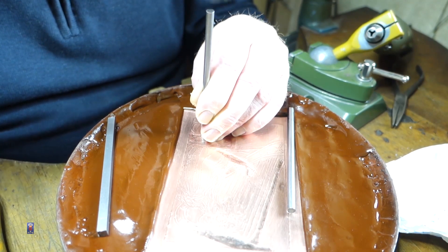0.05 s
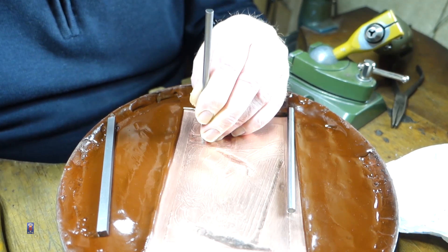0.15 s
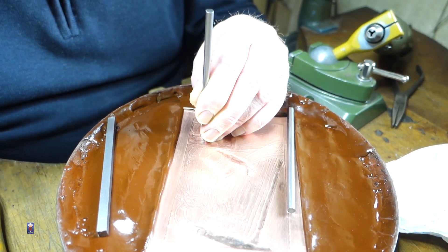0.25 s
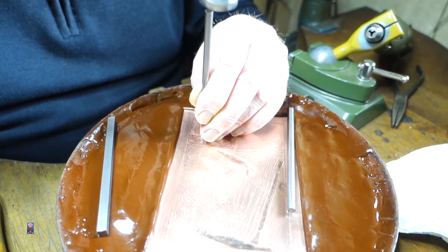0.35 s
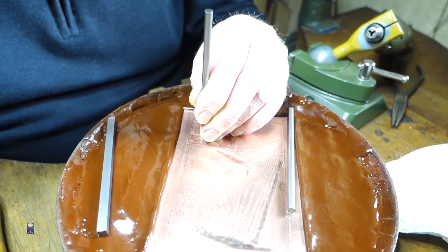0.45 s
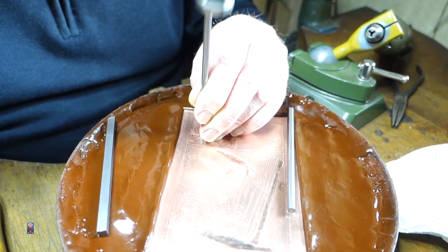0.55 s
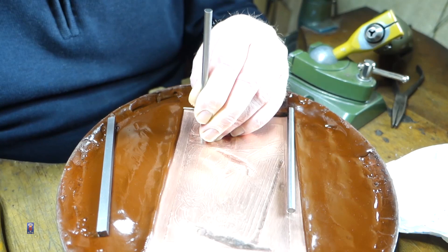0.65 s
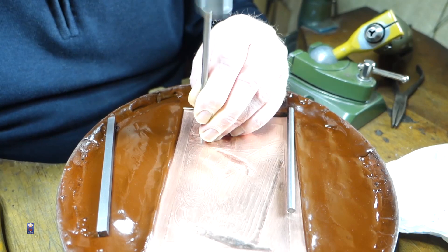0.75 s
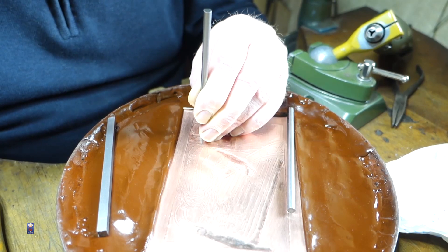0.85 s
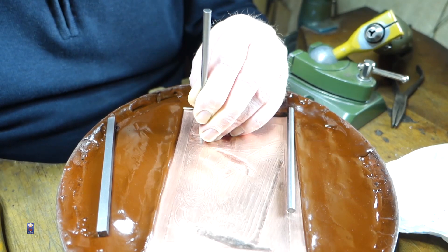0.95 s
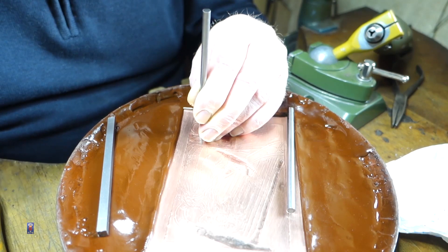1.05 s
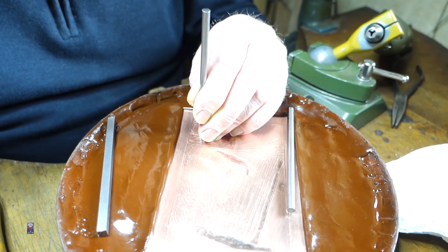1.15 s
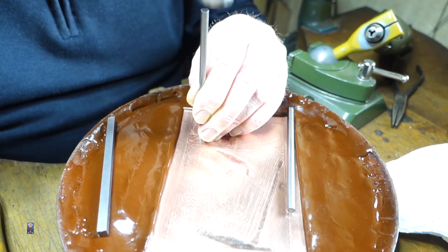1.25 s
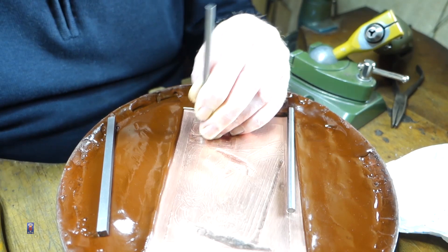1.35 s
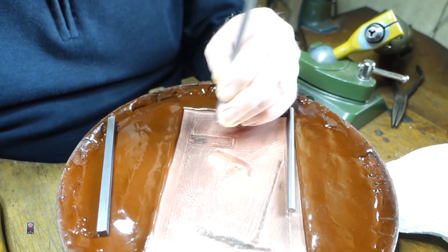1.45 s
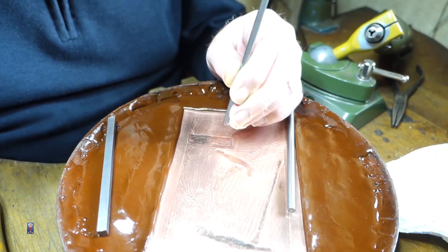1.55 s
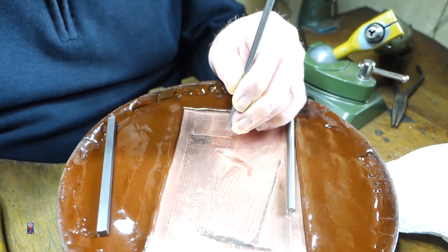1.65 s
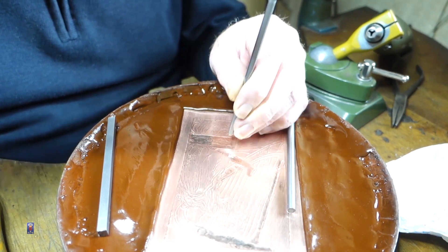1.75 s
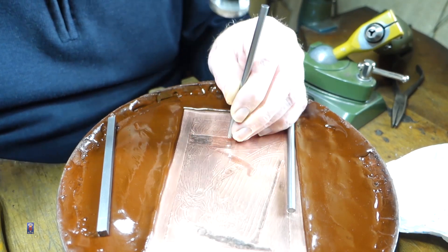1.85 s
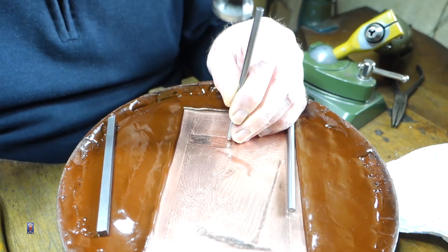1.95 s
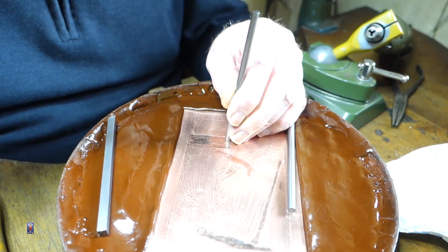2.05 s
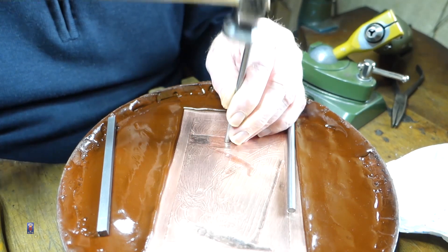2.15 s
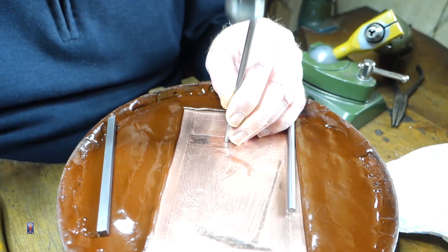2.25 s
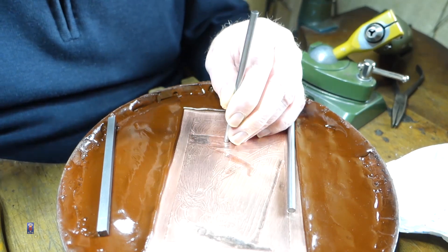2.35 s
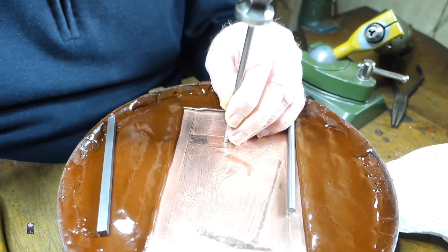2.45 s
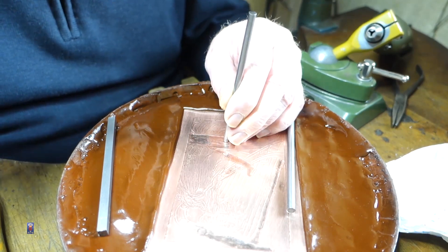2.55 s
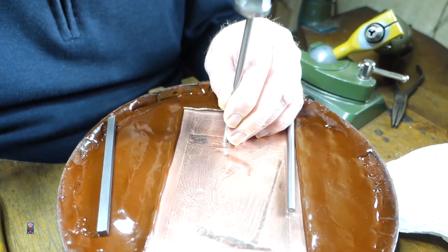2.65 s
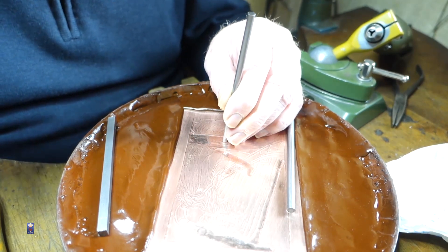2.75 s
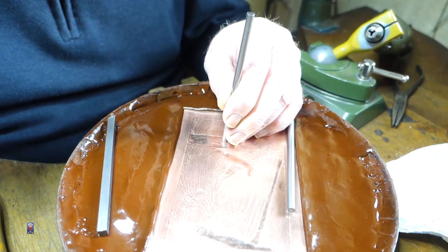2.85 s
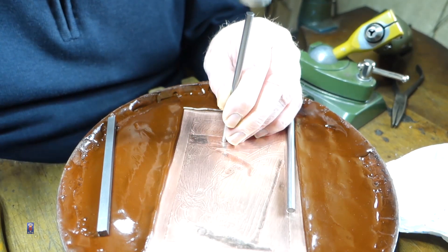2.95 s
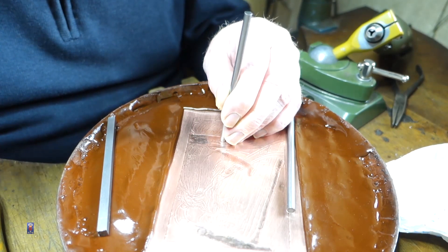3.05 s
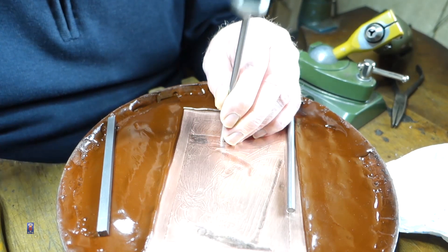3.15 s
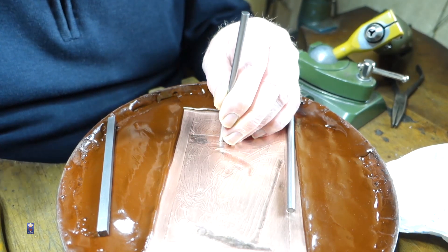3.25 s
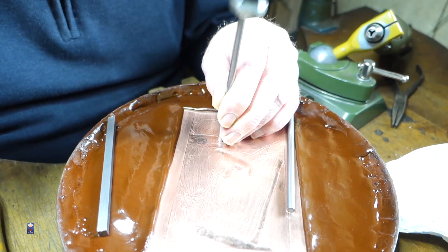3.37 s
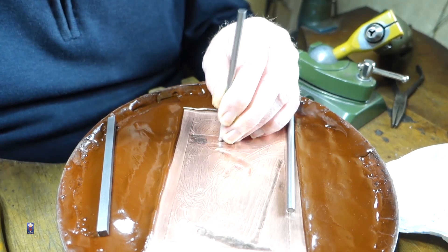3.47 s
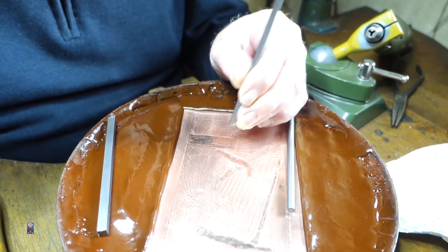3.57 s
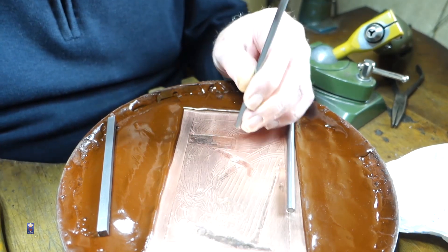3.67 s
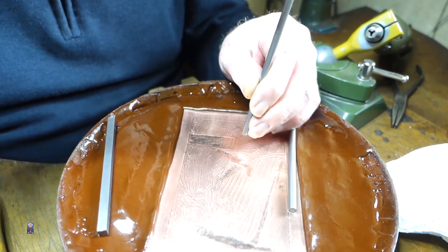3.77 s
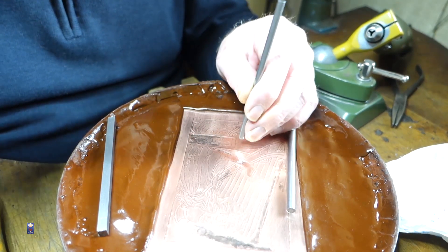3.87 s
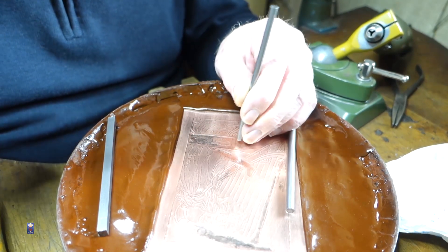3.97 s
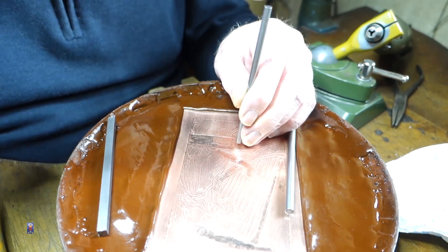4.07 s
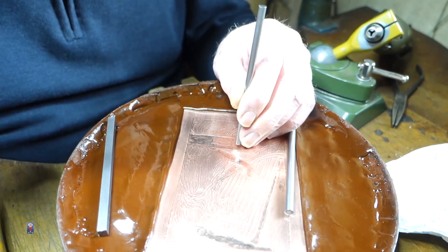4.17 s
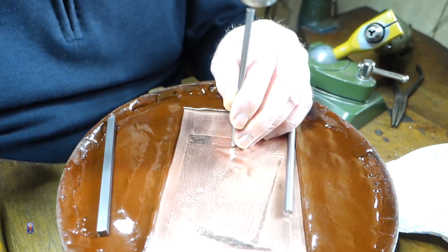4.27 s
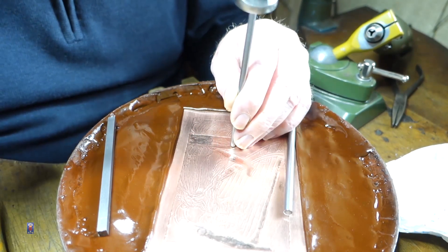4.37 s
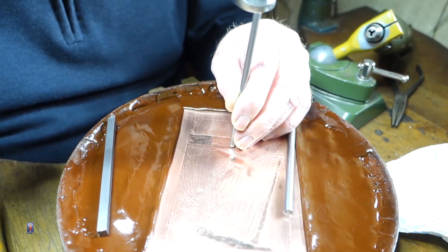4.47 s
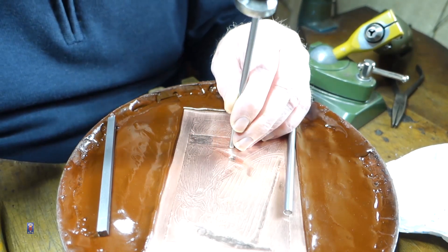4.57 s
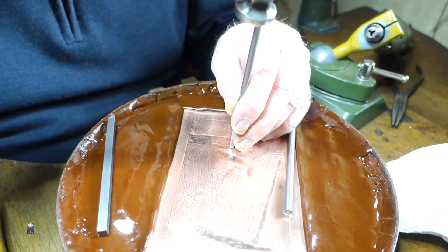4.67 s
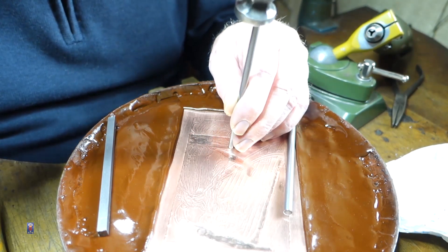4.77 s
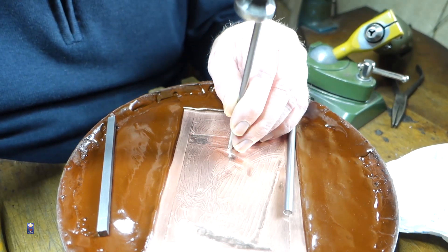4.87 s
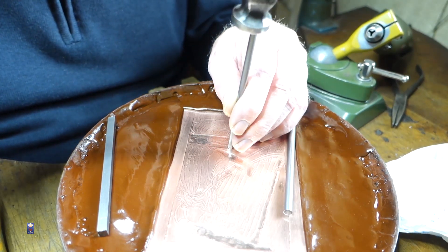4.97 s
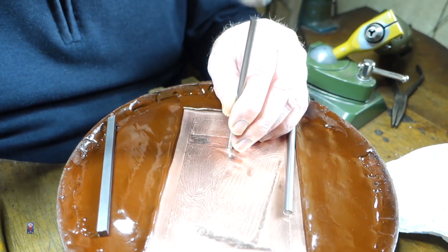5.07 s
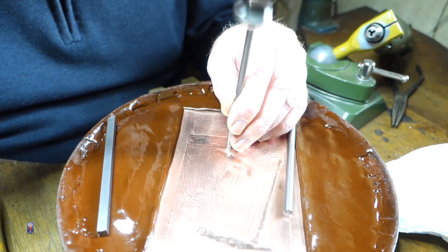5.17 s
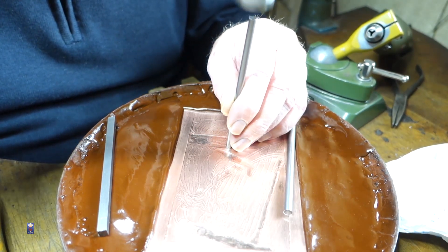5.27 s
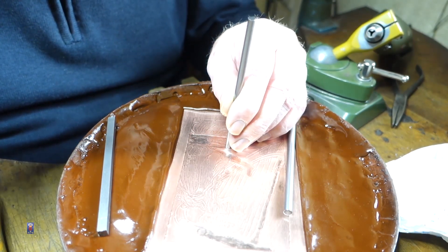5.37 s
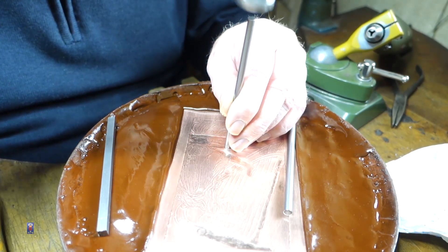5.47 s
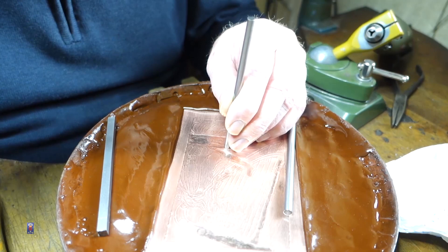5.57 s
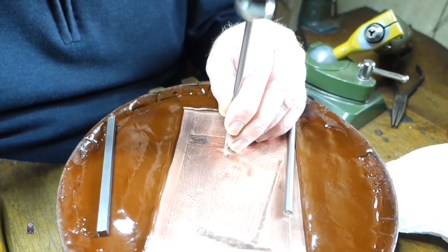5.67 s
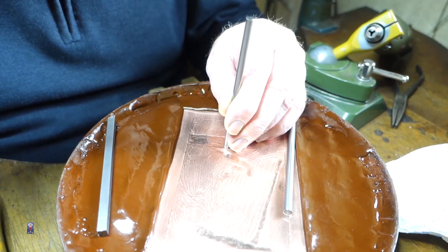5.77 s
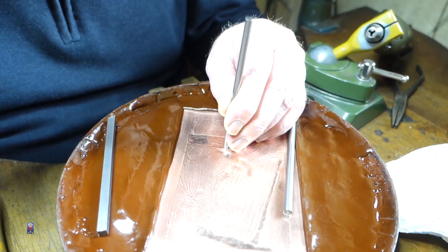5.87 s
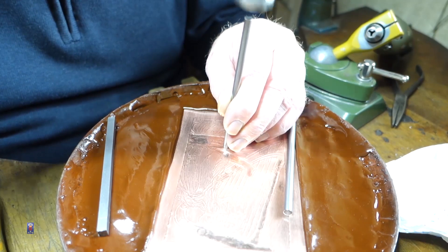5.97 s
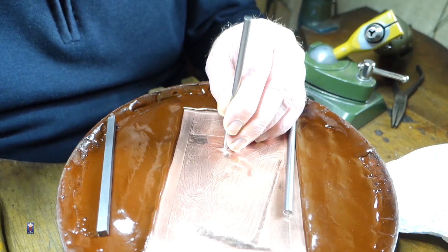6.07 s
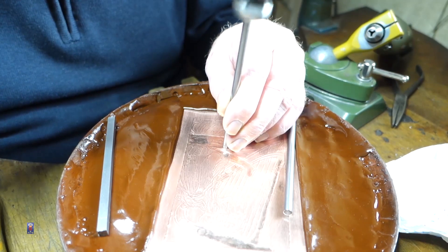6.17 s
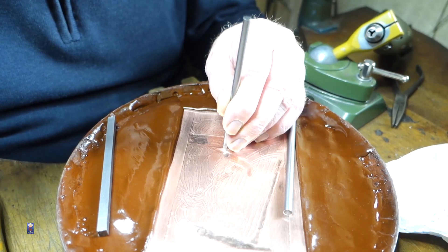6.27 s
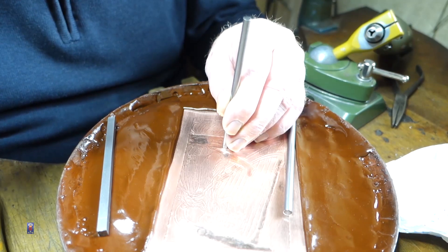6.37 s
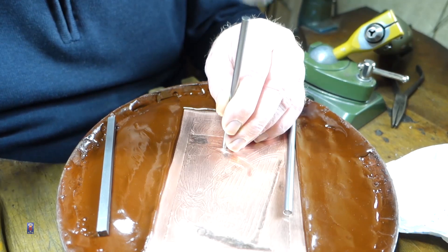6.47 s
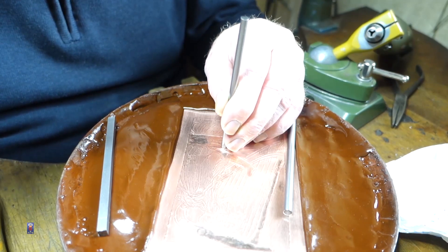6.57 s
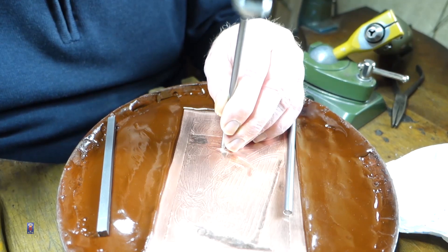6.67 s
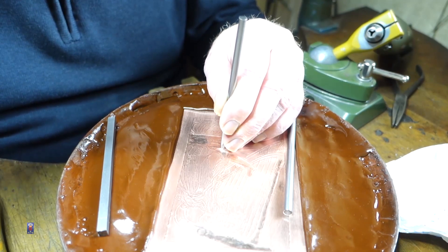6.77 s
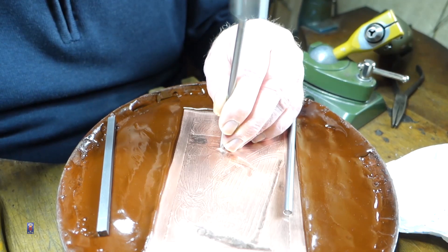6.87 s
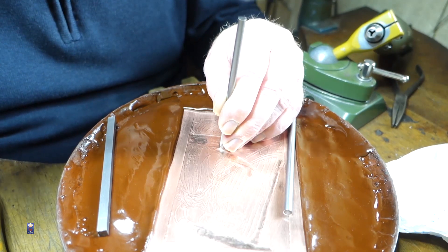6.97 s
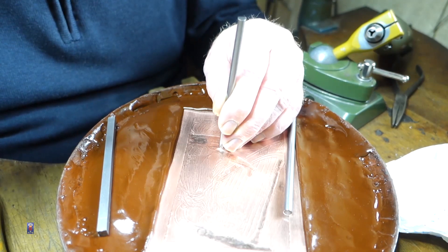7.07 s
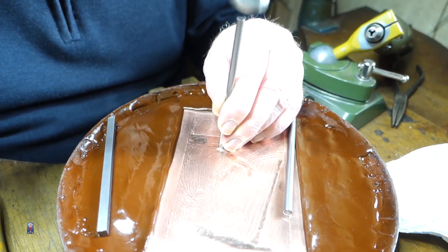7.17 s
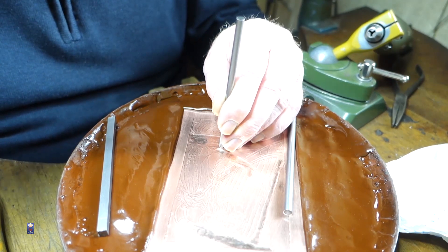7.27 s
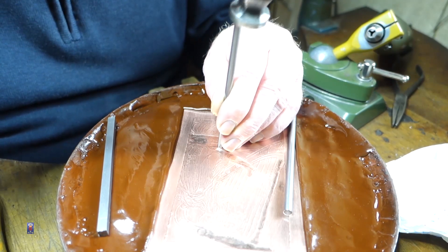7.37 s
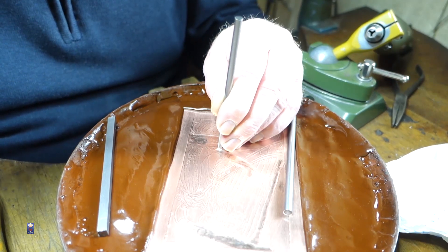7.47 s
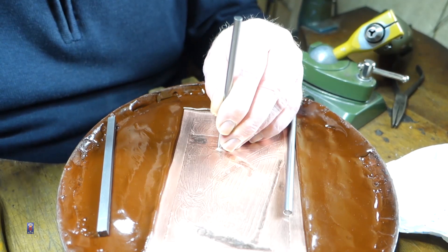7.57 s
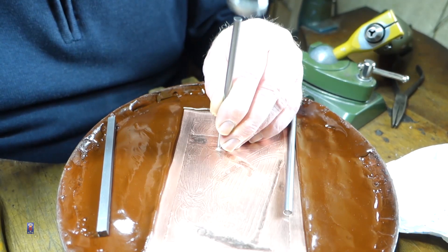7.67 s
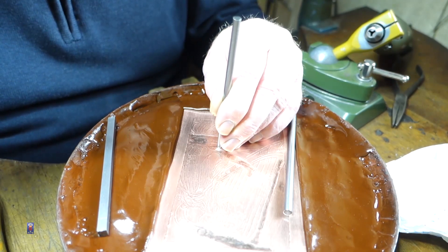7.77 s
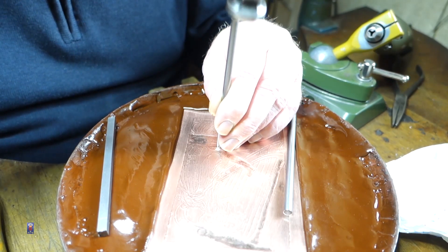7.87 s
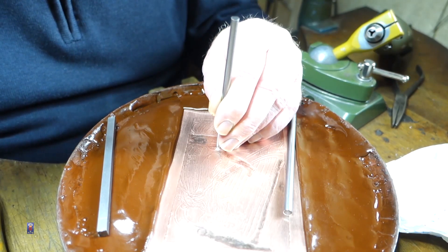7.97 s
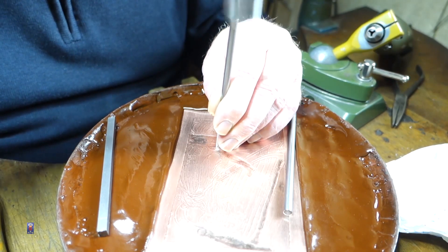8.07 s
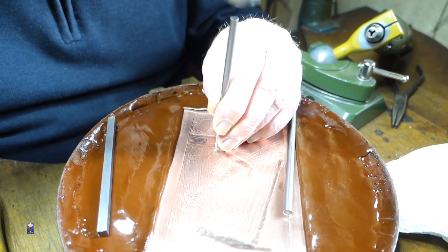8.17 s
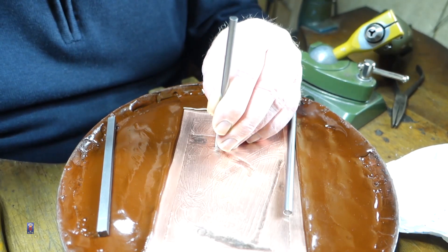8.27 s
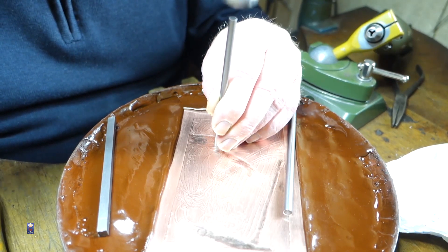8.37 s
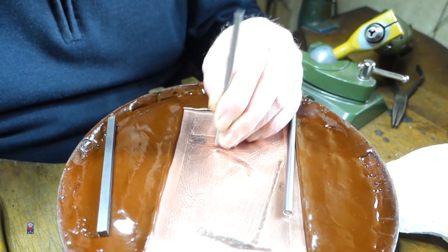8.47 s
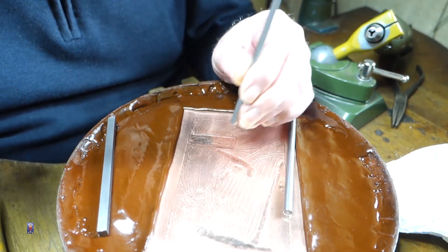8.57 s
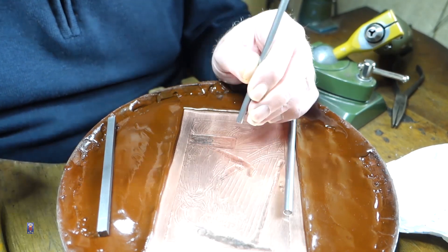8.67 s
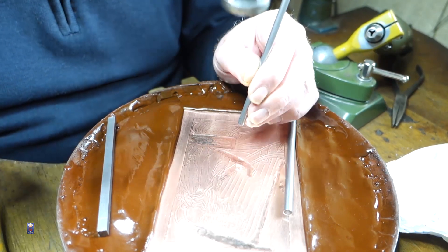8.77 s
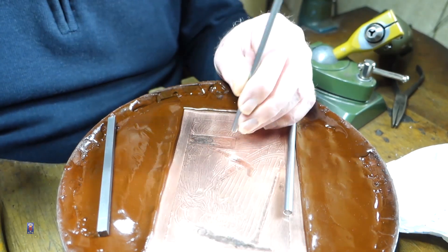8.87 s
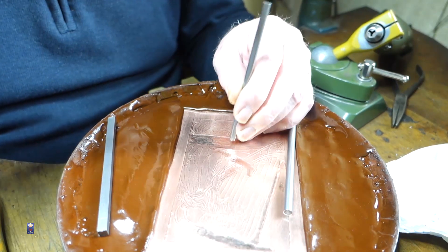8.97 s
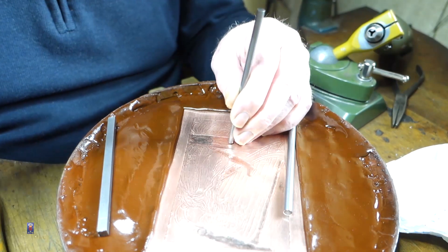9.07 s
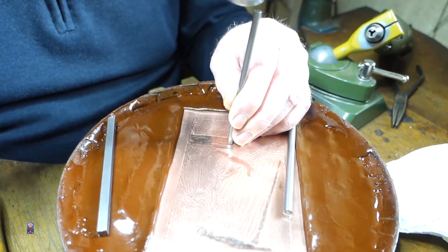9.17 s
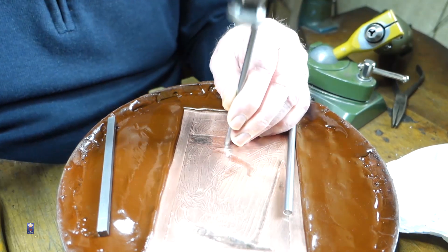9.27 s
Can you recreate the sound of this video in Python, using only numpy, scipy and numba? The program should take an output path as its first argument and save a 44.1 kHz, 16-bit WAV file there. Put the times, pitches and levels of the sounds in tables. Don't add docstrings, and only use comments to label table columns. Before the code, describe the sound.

Close stereo view of a hammer striking a steel punch on copper bedded in pitch. Loud, short, damped clangs come about four a second in three runs, the last the longest. Between them are light trial taps, ticks and soft scrapes. A small hard room returns tight echoes with a low boom, while distant traffic and faint hiss sit underneath.

```python
import sys
import numpy as np
from scipy import signal
from scipy.fft import rfft, irfft
from scipy.io import wavfile
from scipy.ndimage import uniform_filter1d, minimum_filter1d
from numba import njit

SR = 44100
rng = np.random.default_rng(int(sys.argv[2]) if len(sys.argv) > 2 else 0)


def wrap_up_sound(samples):
    columns = np.atleast_2d(samples).T
    tamed = np.clip(columns, -1, 1)
    steps = np.round(tamed * 32767).astype(np.int16)
    wavfile.write(sys.argv[1], SR, steps)


def natural_amplitude(level_db):
    exponent = np.asarray(level_db, float) / 20
    return 10 ** exponent


N = 411012
LEAD = SR // 10


def shape(table, hz):
    f, v = np.transpose(table)
    return np.interp(np.log(hz + 1), np.log(f), v)


def colour(x, table):
    size = x.shape[-1]
    hz = np.arange(size // 2 + 1) * SR / size
    return irfft(rfft(x) * natural_amplitude(shape(table, hz)), size)


def unit(x):
    return x / np.sqrt(np.mean(x ** 2))


def walk(rate):
    hold = int(SR / rate)
    steps = np.repeat(rng.standard_normal(N // hold + 1), hold)
    return 1.3 * uniform_filter1d(uniform_filter1d(steps, hold), hold)[:N]


def two_sides(noise_pair, alike):
    mid, side = noise_pair
    return mid * np.sqrt(1 + alike) + np.outer([1, -1], side * np.sqrt(1 - alike))


def strike(times, db, modes, seconds, rise_s, detune, scatter_db):
    hz, mode_db, t60 = np.transpose(modes)
    t = np.arange(int(seconds * SR)) / SR
    decay = np.exp(-np.log(1000) * t / t60[:, None])
    rise = 1 - np.exp(-(t / rise_s) ** 2)
    out = np.zeros(N + LEAD + len(t))
    chance = rng.standard_normal((len(times), 2, len(hz)))
    for s, g, (off_pitch, off_level) in zip(times, db, chance):
        tones = np.sin(2 * np.pi * np.outer(hz * (1 + detune * off_pitch), t)) * decay
        ring = natural_amplitude(mode_db + scatter_db * off_level) @ tones * rise
        i = int(s * SR) + LEAD
        out[i:i + len(t)] += natural_amplitude(g) * ring / np.abs(ring).max()
    return out[:N + LEAD]


def crack(times, db, table, t60, fresh):
    size = SR // 20
    fall = np.exp(-np.log(1000) * np.arange(size) / SR / t60)
    gain = natural_amplitude(shape(table, np.arange(size // 2 + 1) * SR / size))
    bursts = rng.standard_normal(size) + fresh * rng.standard_normal((len(times), size))
    for _ in range(4):
        bursts = irfft(gain * np.exp(1j * np.angle(rfft(bursts * fall))), size)
    out = np.zeros(N + LEAD + size)
    for s, g, burst in zip(times, db, bursts * np.sqrt(fall)):
        i = int(s * SR) + LEAD
        out[i:i + size] += natural_amplitude(g - 5.0) * burst / np.sqrt(np.sum(burst ** 2) / 10)
    return out[:N + LEAD]


def contacts():
    # (time [s], sheet ring peak [dB], hammer face ring [dB], high when it lands off centre)
    blows = [(-0.096, -9.5, -44), (0.152, -14.5, -44.5), (0.392, -17, -51), (0.62, -16, -53),
             (0.8377, -15.5, -49), (1.064, -16, -50), (1.297, -16, -44.5), (2.4848, -14.5, -36.5),
             (2.7315, -12.5, -37), (2.9751, -14, -39), (3.2189, -14.5, -40.5), (3.4468, -15.5, -41.5),
             (5.252, -19, -28.5), (5.4888, -14.5, -31), (5.7288, -12.5, -35), (5.9804, -11.5, -32),
             (6.2383, -12, -35), (6.4861, -13, -38), (6.7196, -12, -37.5), (6.9588, -14, -31.5),
             (7.1987, -12, -41), (7.4373, -12, -39.5), (7.6858, -13.5, -48), (7.9222, -13, -43),
             (8.1584, -12.5, -42.5), (8.3978, -11.5, -43.5)]
    # (time [s], sheet ring peak [dB], then above it: bowl [dB], shank [dB], punch [dB])
    touches = [
        (2.1353, -35, -1, -9, -17),
        (2.1982, -18, -9, -8.5, 0.5),
        (3.8412, -36, 1, -17, -18),
        (3.9605, -36.5, 9, -12, -10),
        (4.595, -28, -8.5, -19.5, -10),
        (4.9901, -21.5, 0, -2.5, 6),
        (9.2575, -31.5, -6, -20.5, -18),
    ]
    # (start [s], bowl ring [dB], drift as the punch walks [dB per s])
    runs = np.array([
        (-.2, -19, -0.06),
        (2.4, -22, -0.9),
        (5.2, -23.5, -0.68),
    ])
    s, db, face_db = np.transpose(blows)
    start, bowl_db, drift_db = runs[np.searchsorted(runs[:, 0], s) - 1].T
    bowl_db = bowl_db + drift_db * (s - start)
    shank_db = -38 + 0.21 * (face_db + 40)
    punch_db = -19.5 + 0.3 * (db + 14)
    full = np.array([s, db + 10, bowl_db - db, shank_db - db, punch_db - db, face_db - db]).T
    light = np.array(touches)
    light_face_db = -17.5 + 1.3 * light[:, -1]
    rows = np.vstack([full, np.c_[light, light_face_db]])
    return rows[np.argsort(rows[:, 0])].T


def copper_sheet(s, db):
    # (frequency [Hz], level [dB], time to fall 60 dB [s])
    sheet_modes = [(2310, 0, .0135), (2140, -7, .012), (2500, -12, .01)]
    # (frequency [Hz], level [dB])
    sheet_treble = [(2600, 0), (3000, -4.5), (3500, -13.5), (5000, -9.5)]
    ring = strike(s, db, sheet_modes, 0.061, 0.0017, detune=0.004, scatter_db=1.5)
    return colour(ring, sheet_treble)


def pitch_bowl(s, db, bowl_db):
    # (frequency [Hz], level [dB], time to fall 60 dB [s])
    bowl_modes = [(1454, 31.5, 0.02), (1380, -22.5, 0.005), (1680, -9, 0.0045)]
    level_db = db + bowl_db + 7.5 + 0.26 * np.minimum(db - 1, 0)
    return strike(s, level_db, bowl_modes, .05, 0.0002, detune=0.0031, scatter_db=.8)


def punch_shank(s, db):
    # (frequency [Hz], level [dB], time to fall 60 dB [s])
    shank_modes = [(4270, 0, .012), (4810, 0, .02)]
    # (frequency [Hz], level [dB])
    tick = [(2500, -23.5), (3300, -19.5), (3800, -2.5), (4300, -1.5), (5300, -4), (5800, -3), (7000, -4.5),
            (9000, -33.5)]
    ring = strike(s, db + 2.5, shank_modes, 0.04, 0.00052, detune=.004, scatter_db=4.5)
    return ring + crack(s, db + 17.5, tick, .025, fresh=0.69)


def steel_punch(s, db):
    # (frequency [Hz], level [dB], time to fall 60 dB [s])
    punch_modes = [(9380, 0, .015), (8600, -4, .006), (11150, -7, .018)]
    # (frequency [Hz], level [dB])
    snap = [(5000, -38.5), (6500, -12.5), (8000, 1), (9400, 4.5), (10800, -7.5), (12200, -8),
            (14000, -22.5)]
    ring = strike(s, db - 3.5, punch_modes, 0.058, 0.00073, detune=0.0033, scatter_db=6.0)
    return ring + crack(s, db + 10.5, snap, 0.0095, fresh=0.91)


def hammer_face(s, db):
    # (frequency [Hz], level [dB], time to fall 60 dB [s])
    face_modes = [(15350, 0, .008), (13000, -6, .006)]
    # (frequency [Hz], level [dB])
    fizz = [(11000, -50), (12800, 1.5), (14200, 23), (15500, 12.5), (17000, -22)]
    ring = strike(s, db + 15.5, face_modes, .05, 0.0004, detune=.004, scatter_db=2.0)
    return ring + crack(s, db + 20, fizz, 0.033, fresh=1.2)


def thud(s, db):
    # (frequency [Hz], level [dB])
    thump = [(30, -21.5), (60, -9.5), (450, -15), (800, -2.5), (1150, -11), (1900, 1.5), (2700, -5.5),
             (3400, -41.5)]
    return crack(s, db + 14.0, thump, 0.0083, fresh=0.1823)


def bench_boom(s, db):
    # (frequency [Hz], level [dB], time to fall 60 dB [s])
    boom_modes = [(47.3, -5.5, 0.46), (92.4, -3.5, 0.087), (116.7, 7.5, 0.098), (150.3, -4, 0.32),
                  (173, -7, 0.33), (268, 7.5, 0.2), (236.1, -11.5, 0.39), (288, -0.5, 0.21),
                  (467, -15.5, 0.33), (542, -0.5, 0.16)]
    return strike(s, db - 18.0, boom_modes, 0.48, 0.025, detune=0.0085, scatter_db=.5)


def workshop():
    # (frequency [Hz], time [s])
    room_t60 = [(50, 0.36), (130, 0.91), (300, 0.26), (740, 0.28), (1940, 0.24), (5120, 0.27),
                (13500, 0.16)]
    # (frequency [Hz], likeness [0-1])
    likeness = [(130, 0.99), (640, 0.9), (1400, 0.75), (3000, 0.69), (6000, 0), (15000, .05)]
    size, fill_s = SR // 2, 0.0041
    t = np.arange(size) / SR
    hz = np.arange(size // 2 + 1) * SR / size + 1
    pair = two_sides(rfft(rng.standard_normal((2, size))), np.clip(shape(likeness, hz), 0, 1))
    out = 0
    for centre in 44 * 2 ** np.arange(0, 9, .5):
        band = irfft(pair * np.maximum(1 - 2 * abs(np.log2(hz / centre)), 0), size)
        out = out + band * np.exp(-np.log(1000) * t / shape(room_t60, centre))
    return out * (1 - np.exp(-(t / fill_s) ** 2)) / np.sqrt(SR / 100)


def echoes():
    # (delay [ms], level [dB])
    returns = [(7.9, -1.5), (11.1, -2.5), (14.7, -4.5), (17.3, -6), (23.2, 0.5), (32.1, -1.5), (37.0, -1),
               (43.0, -13), (50.5, -8), (73.3, -6.5)]
    sides_db, uneven_db, weak = 6.0, 7.0, 13
    ms, db = np.transpose(returns)
    chance = rng.standard_normal((4, len(ms) + weak))
    late_ms = 4.6 * (np.arange(weak) + .2 * chance[0, len(ms):])
    db = np.append(db, -16 - 0.2092 * late_ms + uneven_db * chance[1, len(ms):])
    at = (np.append(ms, 57 + late_ms) * SR / 1000).astype(int)
    out = np.zeros((2, SR // 5))
    out[0, at + np.round(3 * chance[2]).astype(int)] = natural_amplitude(db + sides_db * chance[3] / 2)
    out[1, at] = natural_amplitude(db - sides_db * chance[3] / 2)
    wall = signal.iirpeak(2310, 2310 / 900, fs=SR)
    return signal.lfilter(*wall, signal.lfilter(*wall, out))


def hammer():
    s, db, bowl_db, shank_db, punch_db, face_db = contacts()
    weight_db = 0.6 * np.minimum(db + 12.5, 0)
    sheet = copper_sheet(s, db)
    rest = pitch_bowl(s, db, bowl_db)
    rest += punch_shank(s, db + shank_db)
    rest += steel_punch(s, db + punch_db)
    rest += hammer_face(s, db + face_db)
    rest += thud(s, db + 0.52 * bowl_db + 0.7 * weight_db)
    rest += clicks()
    boom = bench_boom(s, db + 0.12 * weight_db)

    now = (np.arange(N + LEAD) + 1 - LEAD) / SR
    latest = np.maximum(np.searchsorted(s, now) - 1, 0)
    reach = natural_amplitude(weight_db[latest])
    room = workshop()
    late = 1 - np.exp(-(np.arange(room.shape[1]) / SR / .085) ** 3)
    returns = (natural_amplitude(4.0) * late + natural_amplitude(-14)) * room
    returns[:, :SR // 5] += echoes()
    wet = signal.fftconvolve((reach * sheet)[None], returns, axes=1)
    wet += natural_amplitude(-0.5) * signal.fftconvolve((reach * rest)[None], room, axes=1)
    return (wet[:, :N + LEAD] + sheet + rest + boom)[:, LEAD:]


def note(table, waver, flicker_db):
    s, hz, db = np.transpose(table)
    t = np.arange(N) / SR
    pitch = np.interp(t, s, hz) * (1 + waver * walk(32))
    level_db = np.interp(t, s, db) + flicker_db * walk(39)
    return np.sqrt(2) * np.sin(2 * np.pi * np.cumsum(pitch) / SR) * natural_amplitude(level_db)


def spread(table, alike, flicker_db, rate):
    pair = two_sides(colour(rng.standard_normal((2, N)), table), alike)
    return unit(pair) * natural_amplitude(flicker_db * walk(rate))


def traffic():
    # (time [s], level above the quiet street [dB])
    nearness = [(0, 0), (1.6, 0.5), (2.2, 6.5), (3.6, 5.5), (4.2, 6), (4.8, 10.5), (5.5, 8), (6.5, 6.5),
                (8.6, 3.5), (9.32, 2.5)]
    # (time [s], frequency [Hz], level [dB])
    drone = [(1.2, 155.4, -68), (2.1, 149.6, -54), (3.6, 146.3, -45), (4.3, 150.3, -46), (4.5, 141, -48.5),
             (5.5, 134, -57), (6.5, 146.4, -76), (8.8, 140.5, -59.5), (9.32, 141.8, -59)]
    # (time [s], frequency [Hz], level [dB])
    whine = [(3.8, 183.6, -77), (4.05, 205, -51.5), (4.3, 214, -49), (4.55, 211.8, -54),
             (4.9, 200.4, -57.5), (5.4, 188.5, -50), (5.8, 185, -69.5)]
    # (frequency [Hz], level [dB])
    rumble = [(25, -26), (50, 4.5), (100, 2), (200, -1), (320, -6), (500, -55)]
    # (frequency [Hz], level [dB])
    road = [(150, -23), (300, 0), (600, -1), (1000, -6), (1600, -22.5)]
    # (frequency [Hz], level [dB])
    tyres = [(700, -32), (1300, 8), (2400, 6), (4000, -3.5), (6000, -44)]
    near_db = np.interp(np.arange(N) / SR, *np.transpose(nearness))
    out = note(drone, 0.0076, 3.0) + note(whine, 0.014, 1.3)
    out = out + natural_amplitude(-59 + 1.34 * near_db) * spread(rumble, .96, 1.2, 10)
    out = out + natural_amplitude(-62.5 + 0.9751 * near_db) * spread(road, 0.33, 2.7, 22)
    return out + natural_amplitude(-68 + 1.15 * near_db) * spread(tyres, 0.27, 1.17, 3.2)


def scrapes():
    # (time [s], length [s], frequency [Hz], width [Hz], level [dB])
    rubs = [
        (1.602, 0.094, 3360, 400, -63.5),
        (1.701, .1, 3200, 510, -84),
        (1.946, 0.14, 3040, 1520, -69.5),
        (8.6, .04, 4200, 400, -64),
        (8.662, 0.034, 3010, 3000, -55.5),
        (8.736, 0.065, 6500, 666, -66),
        (8.727, 0.084, 9540, 2580, -61.5),
    ]
    out, t = np.zeros(N), np.arange(N) / SR
    for s, length, hz, width, db in rubs:
        band = signal.butter(2, [hz - width / 2, hz + width / 2], "band", fs=SR, output="sos")
        swell = np.sin(np.pi * np.clip((t - s) / length, 0, 1))
        out += natural_amplitude(db) * swell * unit(signal.sosfilt(band, rng.standard_normal(N)))
    return out * natural_amplitude(4.1 * walk(150))


def clicks():
    # (time [s], peak [dB], lower ring [Hz], upper ring [Hz], knock above peak [dB])
    light_contacts = [
        (2.1336, -34, 1360, 2530, -35),
        (2.198, -13, 1900, 2640, -31),
        (3.8407, -29, 1830, 2400, -37),
        (3.9593, -26.5, 1475, 2780, -32),
        (4.595, -32.5, 1380, 2180, -15.5),
        (4.9912, -23.5, 1500, 4100, -5.5),
        (9.256, -21, 1600, 4500, -35),
    ]
    # (frequency [Hz], level [dB])
    knock = [(60, -14), (150, 4.5), (400, -1.5), (900, -2.5), (1500, -11.5), (2500, -24)]
    s, db, low_hz, high_hz, knock_db = np.transpose(light_contacts)
    out = crack(s, db + knock_db + 24.0, knock, .02, fresh=1.2)
    for k in range(len(s)):
        rings = [(low_hz[k], -1.5, .02), (high_hz[k], -1.5, .014)]
        out += strike(s[k:k + 1], db[k:k + 1] - 4, rings, .05, 0.00016, detune=.001, scatter_db=22.0)
    return out


def scene():
    return hammer() + traffic() + scrapes()


def microphone(dry):
    # (frequency [Hz], level [dB])
    shade = [(200, 0), (700, -1.2), (1500, -3.5), (3000, -4), (5000, -6.5), (10000, -7.5), (16000, -6.5)]
    # (frequency [Hz], level [dB])
    hiss = [(500, -2.5), (3000, -5), (5500, -8.5), (9000, -11), (16000, -5.5)]
    # (frequency [Hz], level [dB])
    top_edge = [(15900, -1), (16300, -25.5), (17000, -26.5), (17600, -55)]
    x = np.array([colour(dry[0], shade), dry[1]])
    hiss_db = -60.5 + np.array([[-2.2], [1.5]])
    x = x + natural_amplitude(hiss_db) * spread(hiss, 0.0307, .3, 1.6)
    return colour(x, top_edge)


@njit
def follow(peak, fall):
    out, e = np.empty(len(peak)), 0.
    for i in range(len(peak)):
        e = max(peak[i], e * fall)
        out[i] = e
    return out


def limiter(x):
    threshold_db, release_db_per_s = -5.5, 280
    ahead = int(0.0029 * SR)
    peak = -minimum_filter1d(-np.abs(x).max(axis=0), size=2 * ahead + 1)
    over = np.maximum(follow(peak, natural_amplitude(-release_db_per_s / SR)) / natural_amplitude(threshold_db), 1)
    return x * uniform_filter1d(over ** -.85, size=ahead)


def low_pass(x):
    return signal.sosfilt(signal.butter(12, 17010, fs=SR, output="sos"), x)


def record(dry):
    mix = limiter(microphone(dry))
    return low_pass(mix)


dry = scene()
out = record(dry)
wrap_up_sound(out)
```